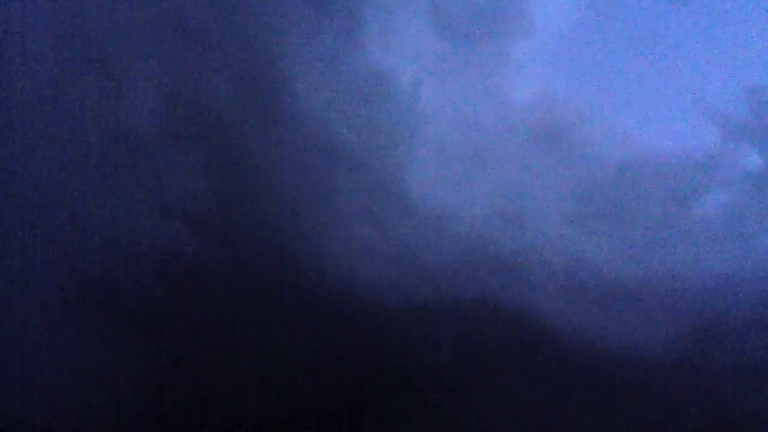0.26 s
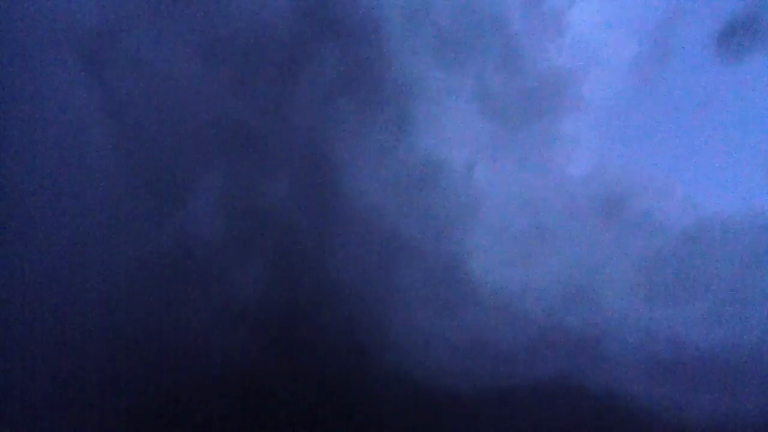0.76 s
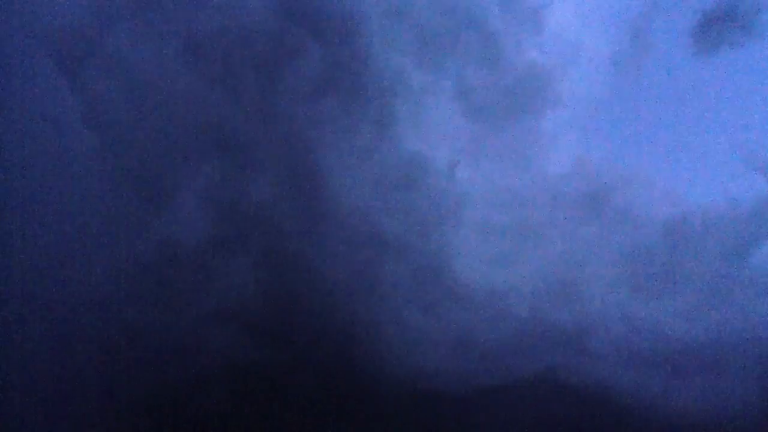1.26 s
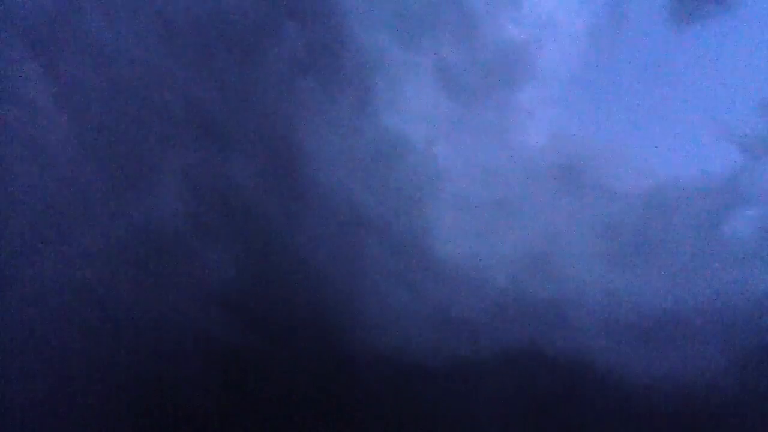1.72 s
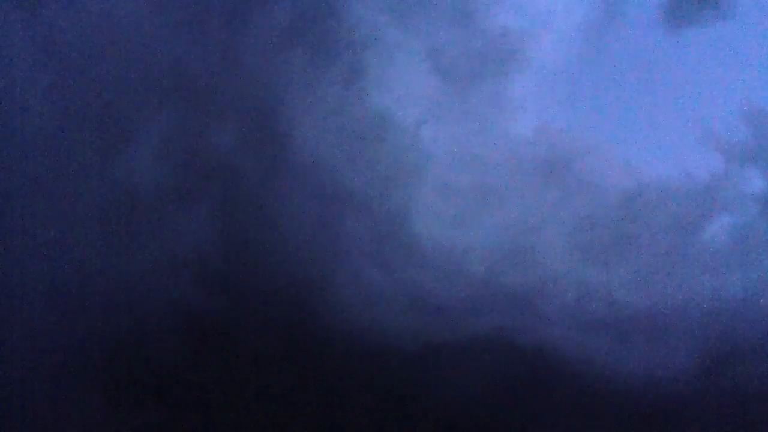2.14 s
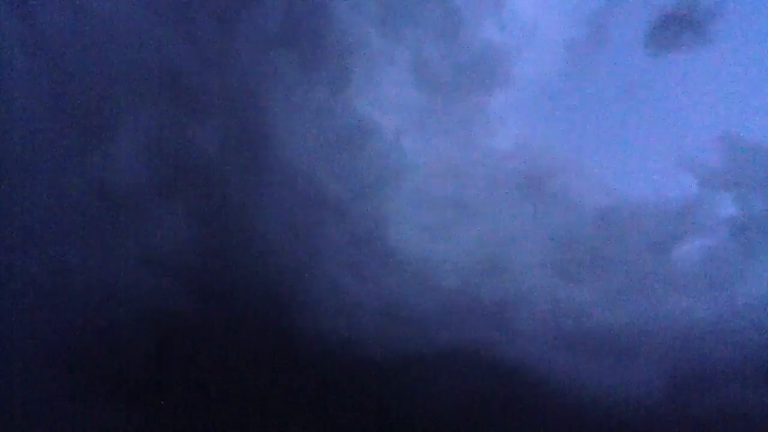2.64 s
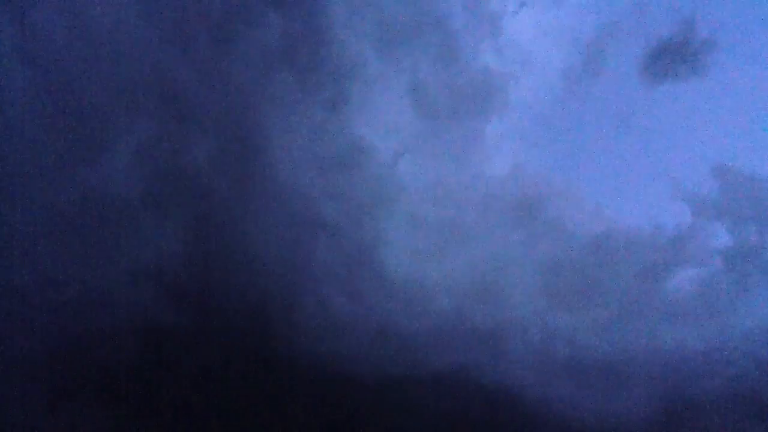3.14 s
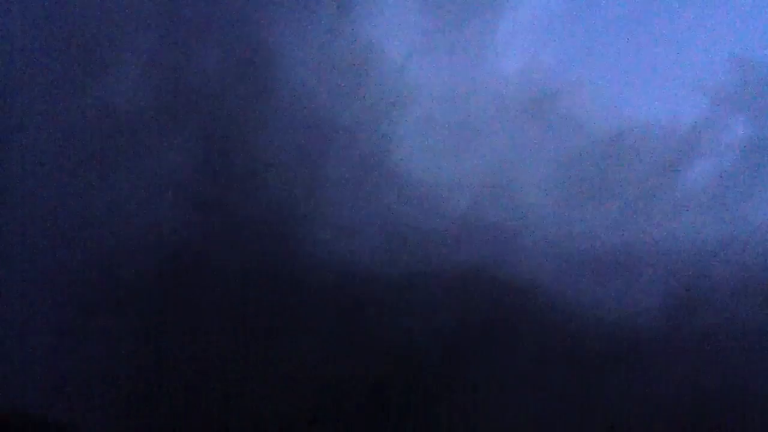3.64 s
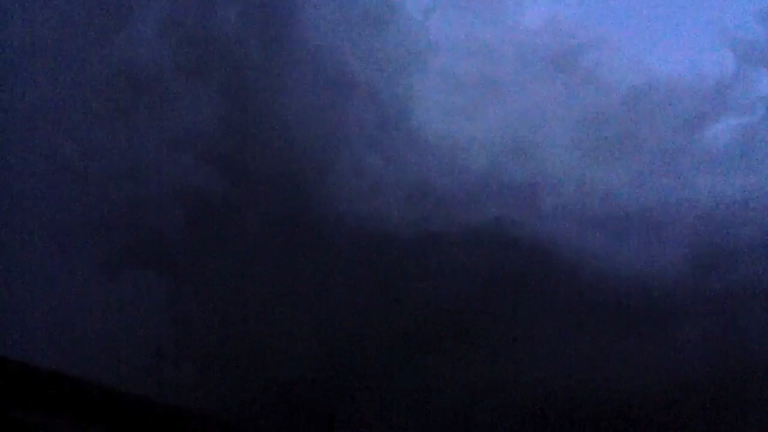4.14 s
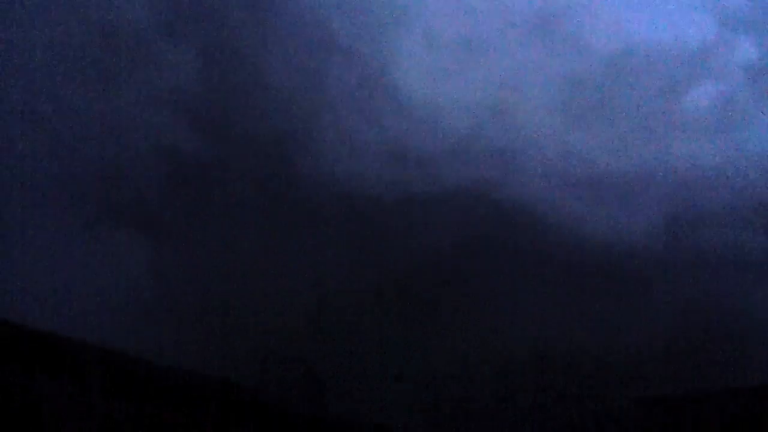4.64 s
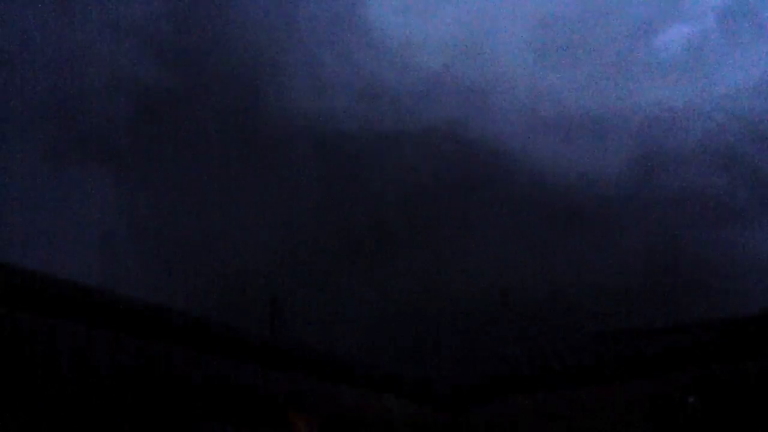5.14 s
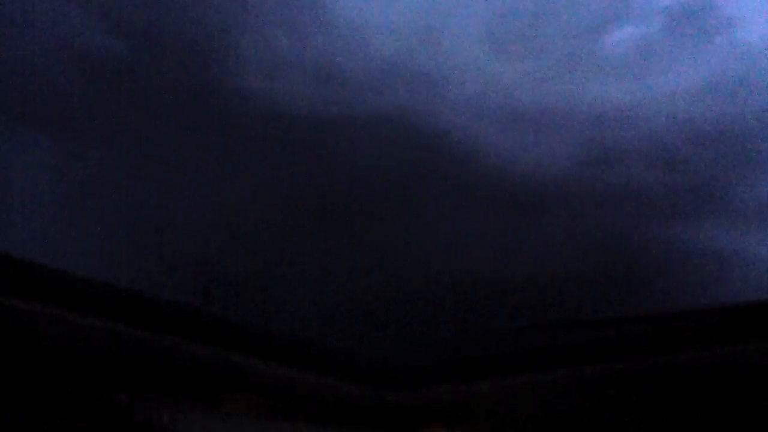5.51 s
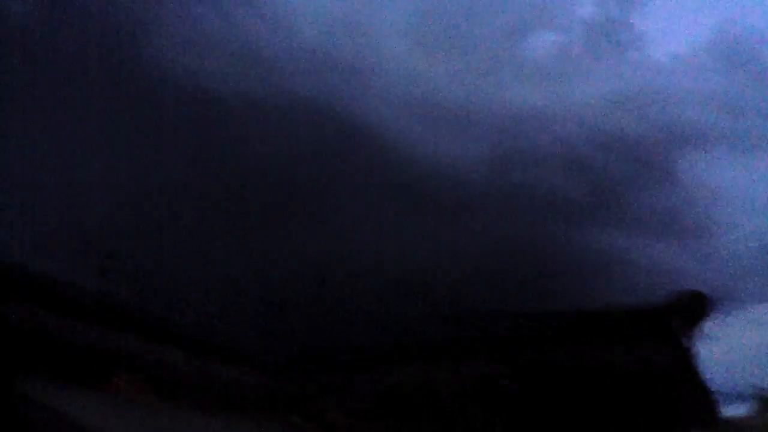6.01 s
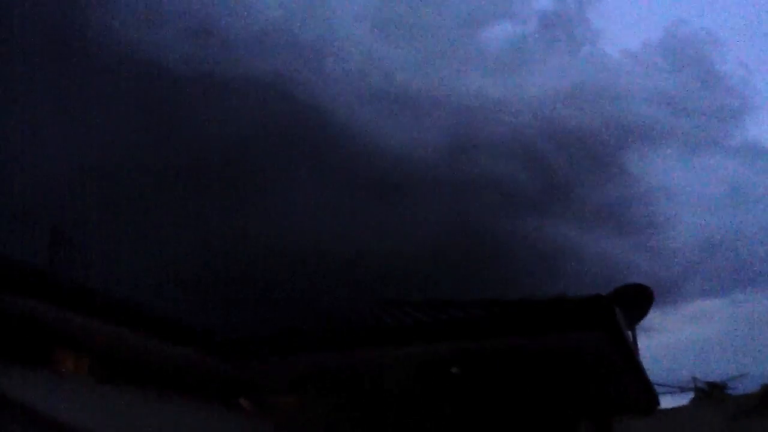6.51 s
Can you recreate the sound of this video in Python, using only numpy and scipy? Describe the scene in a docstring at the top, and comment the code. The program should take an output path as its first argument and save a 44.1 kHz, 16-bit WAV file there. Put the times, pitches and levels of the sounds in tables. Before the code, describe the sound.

Deep thunder is rolling from the start, outdoors over a town at dusk. It is loudest from about 0.2 to 1.3 seconds, with a slight drone and several dull thuds inside it. Weaker, more distant swells follow around 1.5 seconds and from 2.2 to 2.8 seconds. After a lull, a short, sharp, stuttering clap stands out at about 3.3 seconds. The rumble returns softly from 3.9 to 4.7 seconds and again around 5.4, ending with a few muffled thumps near 6.4 seconds.

Far quieter, a cricket chirps nearly five times a second throughout, over the thin trill of more distant insects and a soft steady hiss. Close to the microphone, faint rustles come around 0.5 seconds and now and then later. A few tiny bright ticks fall between 3 and 6 seconds, the last one the clearest.

```python
"""A town at dusk: thunder rolls and dies away in several swells, with one short stuttering clap halfway.
The roll is a crowd of shock fronts (sudden jumps in air pressure) from all along the lightning's path,
dulled by the air they cross. Crickets chirp and trill faintly with their wings over a soft hiss.
Close by there are soft rustles and a few tiny ticks."""
import sys
import numpy as np
from scipy import signal
from scipy.fft import rfft, irfft
from scipy.io import wavfile

SR = 44100
rng = np.random.default_rng(int(sys.argv[2]) if len(sys.argv) > 2 else 0)


def generate_wav(signal):
    """Clip the signal to [-1, 1] and save it as 16-bit WAV at the path in sys.argv[1]."""
    frames = np.transpose(np.atleast_2d(signal))
    scaled = np.clip(frames, -1, 1) * 32767
    pcm = np.round(scaled).astype(np.int16)
    wavfile.write(sys.argv[1], SR, pcm)


N = 297965
TIME = np.arange(N) / SR

# One swell per branch of the lightning. Each row: second when it is full, seconds it holds,
# deep level in dB, crisp level in dB (before the boost).
ROLL_SWELLS = [(0.0, 0.044, -19, -35), (0.185, 0.3, -14.5, -30.5), (0.671, .14, -18, -36),
               (0.947, .22, -16.5, -36), (1.35, 0.069, -28, -44.5), (1.527, 0.1, -26, -44),
               (2.03, .02, -33.5, -44.5), (2.198, 0.048, -26.5, -40), (2.393, 0.053, -24.5, -41),
               (2.706, 0.045, -25.5, -39.5), (3.03, 0.034, -37.5, -62), (3.93, 0.034, -31.5, -47),
               (4.182, 0.16, -29, -45.5), (4.444, 0.28, -32, -45.5), (5.28, 0.41, -34, -51.5),
               (5.993, 0.03, -40, -52.5), (6.378, 0.14, -38, -58)]
# The tone colours of the first peal, the distant peals and the crisp part of the roll.
# Each row: frequency in Hz, relative level in dB.
PEAL_COLOUR = [(20, -52), (50, -43.5), (85, -27), (125, -9.5), (145, -1), (165, -8.5), (188, 1.5),
               (250, -2.5), (290, -4), (400, -7.5), (510, -16.5), (750, -27.5), (1300, -60.5),
               (3000, -90.5)]
DISTANT_COLOUR = [(20, -47), (50, -41), (80, -23), (115, -11.5), (148, -0.5), (195, -1.5), (225, -6),
                  (270, -3), (390, -12.5), (520, -21.5), (750, -43), (1300, -55.5), (3000, -79.5)]
CRISP_COLOUR = [(100, -38.5), (300, -5.5), (450, 6.5), (620, 3), (830, 0.5), (1000, -5), (1150, -10),
                (1350, -16), (1700, -23), (2400, -40.5), (5000, -54)]
# The yard rings at a few pitches while the first peal sounds. Each row: pitch in Hz, width in Hz, level in dB
# compared with the peal.
YARD_RING = [(189.3, 14, -6), (227, 14, -5), (426, 34, -12)]
# The first peal gives way to distant ones. Each row: time in seconds, distant share from 0 to 1.
DISTANT_SHARE = [(1.1, 0.077), (2.3, 0.96)]
def thunder_roll(crisp_boost_db=1.26):
    """Deep and crisp fronts swell as each branch of the lightning is heard; far branches sound lower."""
    starts, holds, deep_db, crisp_db = np.transpose(ROLL_SWELLS)
    deep_level = roll_level(starts, holds, deep_db, rise_db_per_s=150, fall_db_per_s=59.5, linger_db=-35)
    crisp_level = roll_level(starts, holds, crisp_db, rise_db_per_s=79.5, fall_db_per_s=29.5,
                             linger_db=-50)
    peal = front_crowd(PEAL_COLOUR, per_s=1300, spread_db=2, smooth_s=0.1)
    peal = evened(peal + fuzzy_chord(YARD_RING))
    distant = front_crowd(DISTANT_COLOUR, per_s=900, spread_db=2, smooth_s=0.082)
    far = np.interp(TIME, *np.transpose(DISTANT_SHARE))
    deep = np.sqrt(1 - far) * peal + np.sqrt(far) * distant
    crisp = front_crowd(CRISP_COLOUR, per_s=3000, spread_db=0.6, smooth_s=0.1)
    return deep_level * deep + gain_of(crisp_boost_db) * crisp_level * crisp


def roll_level(starts, holds, levels_db, rise_db_per_s, fall_db_per_s, linger_db):
    """Each swell climbs fast, holds and dies more slowly, on top of a lingering rumble."""
    power = gain_of(linger_db - TIME) ** 2  # the rumble fades by 1 dB a second
    for s, hold, db in zip(starts, holds, levels_db):
        before = np.maximum(s - TIME, 0)
        after = np.maximum(TIME - s - hold, 0)
        power += gain_of(db - rise_db_per_s * before - fall_db_per_s * after) ** 2
    return np.sqrt(power)


def front_crowd(points, per_s, spread_db, smooth_s):
    """Fronts of uneven size arrive at random and blur into a rumble, which is held at an even level."""
    sizes = gain_of(spread_db * np.minimum(rng.exponential(1, N), 4))
    signs = rng.choice([-1, 1], N)
    arrivals = rng.random(N) < per_s / SR
    crowd = colour(sizes * signs * arrivals, points)
    window = signal.windows.hann(int(smooth_s * SR))
    slow_power = signal.oaconvolve(crowd ** 2, window / window.sum(), "same")
    return crowd / np.sqrt(abs(slow_power) + 1e-4)


# Single fronts that stand out of the roll.
# Each row: start in seconds, peak level in dB, frequency in Hz above which the air has dulled it.
LOUD_FRONTS = [(0.282, -11, 380), (0.702, -12, 374), (0.912, -9.5, 262), (0.944, -12.5, 239),
               (0.962, -12, 259), (1.267, -11, 300), (1.35, -19, 130), (1.505, -20.5, 278),
               (2.388, -14, 270), (3.3221, -6.5, 477), (3.3461, -18, 1500), (3.3532, -12.5, 170),
               (3.3636, -11, 380), (3.3927, -22, 220), (3.405, -12, 328), (3.709, -27.5, 240),
               (5.4, -27, 240), (6.349, -22.5, 220), (6.4, -22, 170), (6.453, -27, 170), (6.495, -27, 170)]
# A front's tone colour, thin in the deepest bass. Each row: frequency in Hz, relative level in dB.
FRONT_COLOUR = [(20, -48), (50, -30.5), (80, -18.5), (115, -7.5), (150, 3), (205, 1.5), (300, -4.5),
                (400, -12), (550, -12.5), (850, -23.5), (1150, -36.5), (1600, -44), (3000, -72)]
def thunder_shocks(echo_db=-21, echo_s=0.23):
    """Each front is a pressure pulse, rounded by the air; a quick run of them makes the clap."""
    pulse = colour(-signal.unit_impulse(SR // 10), FRONT_COLOUR)
    out = np.zeros(N)
    for s, db, dull_hz in LOUD_FRONTS:
        front = signal.sosfilt(signal.butter(2, dull_hz, fs=SR, output="sos"), pulse)
        add(out, s, gain_of(db) * front / abs(front).max())
    # walls and roofs scatter a weak echo
    t = np.arange(SR // 2) / SR
    tail = rng.standard_normal(len(t)) * gain_of(-60 * t / echo_s) * (t > .012)
    echo = signal.oaconvolve(out, tail / np.linalg.norm(tail))[:N]
    return out + gain_of(echo_db) * echo


# The pitches at which the cricket's wings ring. Each row: pitch in Hz, width in Hz, relative level in dB.
WING_TONES = [(1930, 90, -9), (2057, 25, -0.5), (2132, 55, 1)]
def near_cricket(chirp_s=.13, direct_db=-62.5, scattered_db=-59.5, pitch_hz=2145, sag_hz_per_s=450):
    """The nearest cricket's wings ring in chirps, nearly five times a second."""
    chirps = chirp_beat()
    detunes_hz = rng.normal(0, 25, len(chirps))
    # heard directly, each chirp is a pure tone that sags a little
    t = np.arange(-.07, .07, 1 / SR)
    direct = np.zeros(N)
    for (s, accent_db), detune in zip(chirps, detunes_hz):
        turns = np.cumsum(pitch_hz + detune - sag_hz_per_s * t) / SR
        tone = np.sqrt(2) * np.sin(2 * np.pi * turns)
        add(direct, s + t[0], gain_of(direct_db + accent_db) * tone * signal.windows.hann(len(t)))
    # scattered by the town, it is a fuzzy tone
    beat = swells([(s, chirp_s, scattered_db + accent_db) for s, accent_db in chirps], flatness=4)
    return direct + beat * evened(fuzzy_chord(WING_TONES))


def chirp_beat(count=33, first_s=.021, period_s=.2144, shrink_s=.0003, jitter_s=.0097, spread_db=.5):
    """A slightly uneven beat that barely quickens: each chirp's middle in seconds and accent in dB."""
    periods = period_s - shrink_s * np.arange(count)
    late, louder = rng.standard_normal((count, 2)).T
    middles = first_s + np.cumsum(periods) - periods + jitter_s * late
    return list(zip(middles, spread_db * louder))


# Crickets further off. Each row: pitch in Hz, width in Hz, level in dB.
CRICKET_CHORUS = [(1968, 240, -65.5), (2274, 50, -63), (2326, 58, -63.5), (2263, 250, -65),
                  (4070, 190, -77.5)]
# Other insects. Each row: middle in seconds, length in seconds, level in dB, pitch in Hz, width in Hz.
INSECT_BOUTS = [(3.078, .6, -74, 3880, 45), (5.45, 1, -72, 3895, 80), (6.177, .14, -61, 1900, 110)]
def far_insects():
    """Many crickets merge into one trill, while other insects sing in short bouts."""
    out = fuzzy_chord(CRICKET_CHORUS)
    for s, length, db, hz, width in INSECT_BOUTS:
        out += swells([(s, length, db)], flatness=4) * fuzzy_tone(hz, width)
    return out


# Soft rustles close by. Each row: middle in seconds, length in seconds, level in dB.
RUSTLE_SWELLS = [(.39, 0.24, -63), (.491, 0.042, -55), (.645, .06, -64), (1.57, .14, -68), (4.53, .05, -65),
                 (5.2, 0.28, -69), (6.42, 0.2, -64)]
# Their tone colour. Each row: frequency in Hz, relative level in dB.
RUSTLE_TONE = [(1000, -11), (3000, -4), (6500, -1), (9200, -5), (11000, -11), (14500, -5)]
def rustles():
    """Each rustle is a short swell of bright noise."""
    return swells(RUSTLE_SWELLS, flatness=2) * colour(rng.standard_normal(N), RUSTLE_TONE)


# Tiny ticks close by. Each row: start in seconds, peak level in dB.
TICK_HITS = [(3.21, -40), (4.379, -40), (5.3, -40), (5.603, -40), (6.003, -33.5)]
# Their tone colour. Each row: frequency in Hz, relative level in dB.
TICK_TONE = [(1000, -15), (4000, 4), (8000, 6), (11000, 2), (14000, -5)]
def ticks():
    """Each tick is a single bright click."""
    click = colour(signal.unit_impulse(SR // 20), TICK_TONE)
    out = np.zeros(N)
    for s, db in TICK_HITS:
        add(out, s, gain_of(db) * click / abs(click).max())
    return out


# The tone colour of the hiss. Each row: frequency in Hz, relative level in dB.
HISS_COLOUR = [(30, -2), (200, 16), (800, 4), (1500, 1.5), (2600, -1.5), (3800, -1.5), (4800, -6),
               (6300, -7), (8000, -10.5), (11000, -12.5), (15500, -15)]
def hiss(level_db=-55):
    """Soft, steady noise lies behind everything."""
    return gain_of(level_db) * colour(rng.standard_normal(N), HISS_COLOUR)


def gain_of(db):
    """Turns decibels into a number to multiply a sound by."""
    return 10 ** (np.asarray(db) / 20)


def evened(x):
    """Scales a sound to an average power of 1."""
    return x / np.sqrt(np.mean(x ** 2) + 1e-20)


def add(mix, s, sound):
    """Mixes a sound in, starting at second s."""
    part = mix[max(round(s * SR), 0):][:len(sound)]
    part += sound[:len(part)]


def colour(x, points, size=8192):
    """Gives a sound a tone colour and a power of 1, keeping sudden starts sharp."""
    hz, db = np.transpose(points)
    log_hz = np.log(abs(np.fft.fftfreq(size, 1 / SR)) + 1)
    log_gain = np.log(gain_of(np.interp(log_hz, np.log(hz), db)))
    spectrum = np.exp(np.conj(signal.hilbert(log_gain)))  # rings after a pulse, never before it
    response = np.fft.ifft(spectrum).real[:size // 2]
    return evened(signal.oaconvolve(x, response)[:len(x)])


def fuzzy_tone(hz, width):
    """Noise narrowed to a band around one pitch; a wider band sounds fuzzier."""
    offset = (np.fft.rfftfreq(N, 1 / SR) - hz) / width
    return evened(irfft(rfft(rng.standard_normal(N)) / (1 + 2 * offset ** 2), N))


def fuzzy_chord(rows):
    """Several fuzzy tones at once, each at its own level."""
    return sum(gain_of(db) * fuzzy_tone(hz, width) for hz, width, db in rows)


def swells(rows, flatness):
    """A level that rises and falls once for each row."""
    return sum(gain_of(db) * np.exp(-(2 * (TIME - s) / length) ** flatness) for s, length, db in rows)


def scene():
    """Thunder over the evening background, in mono."""
    background = hiss()
    thunder = thunder_roll() + thunder_shocks()
    return (thunder + near_cricket() + far_insects() + rustles() + ticks() + background)[None]


def record(dry):
    """Cuts away the very highest treble, above 15400 Hz."""
    treble_cut = signal.firwin(511, 15400, window=("kaiser", 9), fs=SR)
    return signal.oaconvolve(dry, treble_cut[None], "same")


dry = scene()
out = record(dry)
generate_wav(out)
```